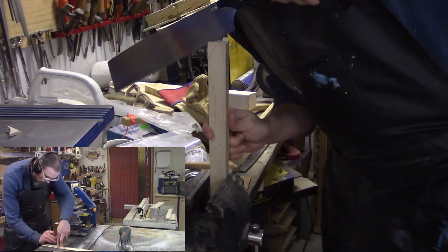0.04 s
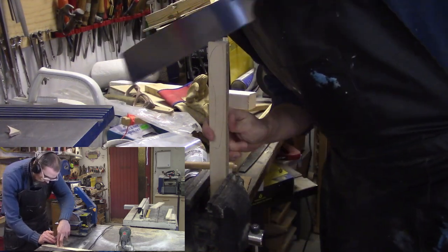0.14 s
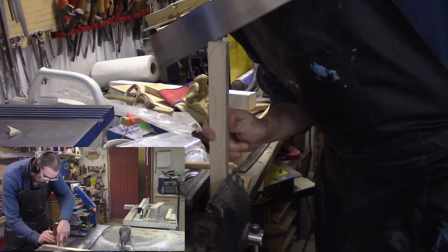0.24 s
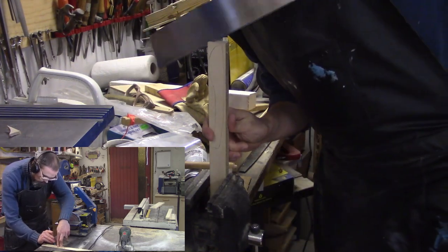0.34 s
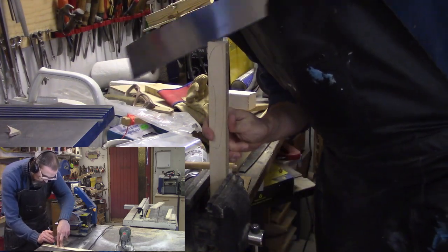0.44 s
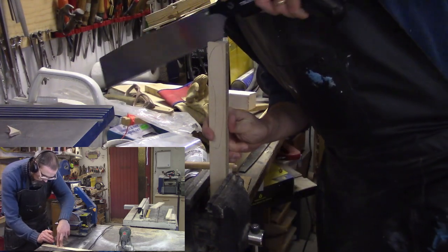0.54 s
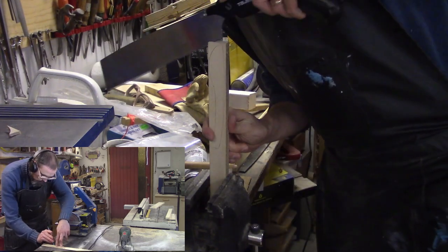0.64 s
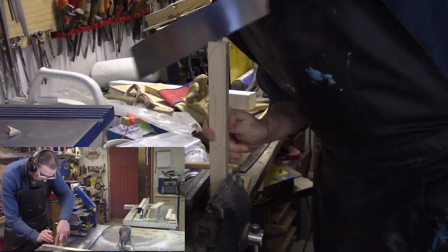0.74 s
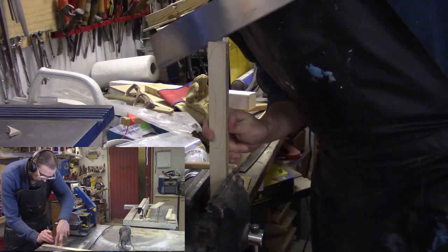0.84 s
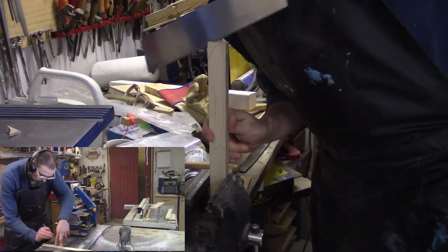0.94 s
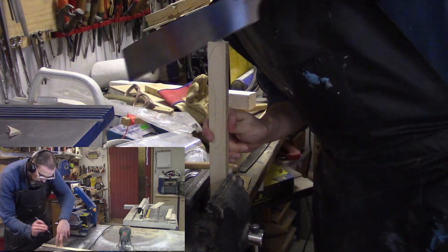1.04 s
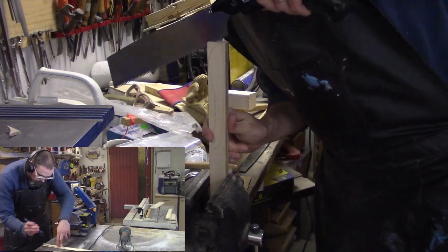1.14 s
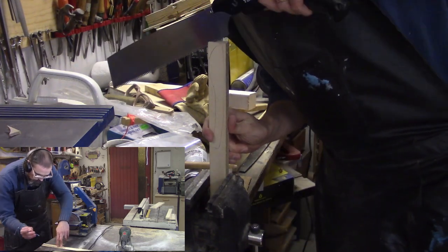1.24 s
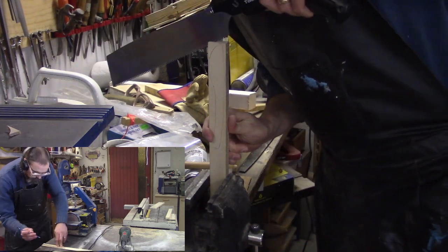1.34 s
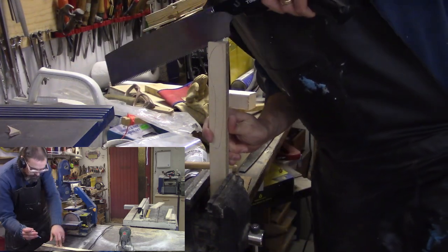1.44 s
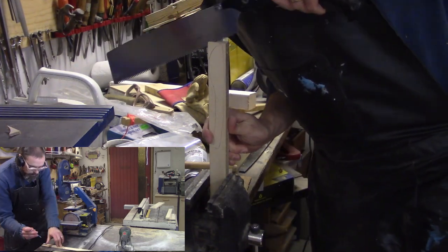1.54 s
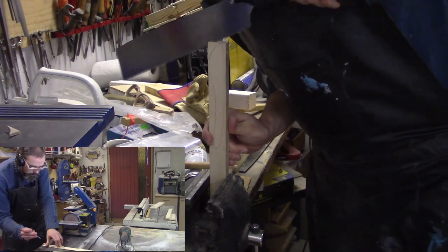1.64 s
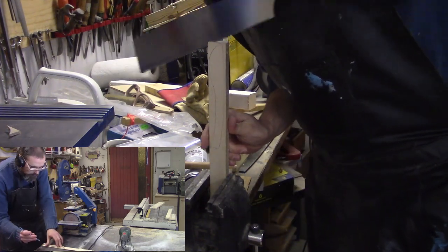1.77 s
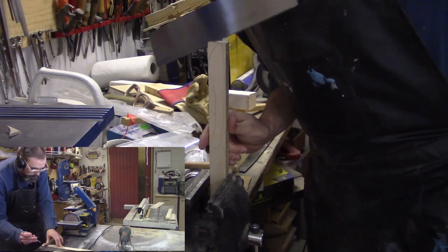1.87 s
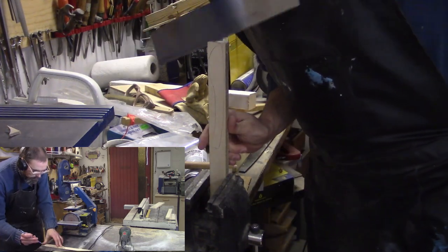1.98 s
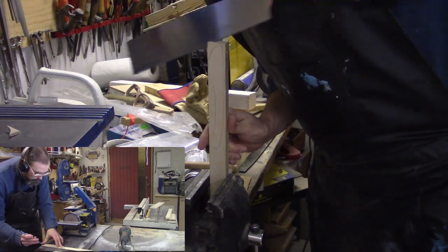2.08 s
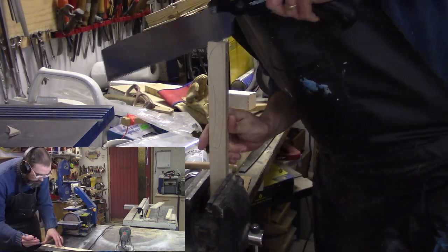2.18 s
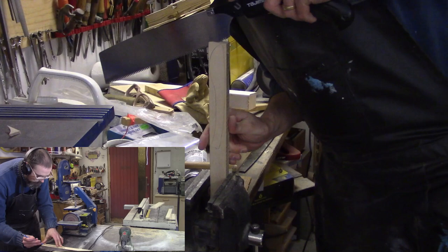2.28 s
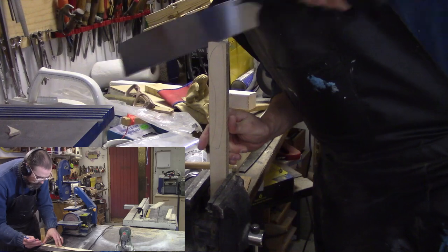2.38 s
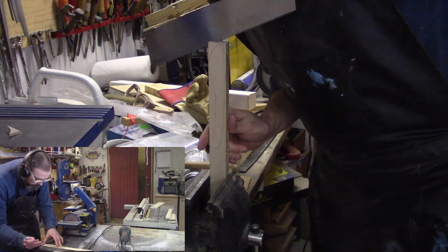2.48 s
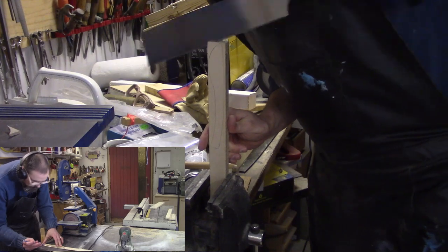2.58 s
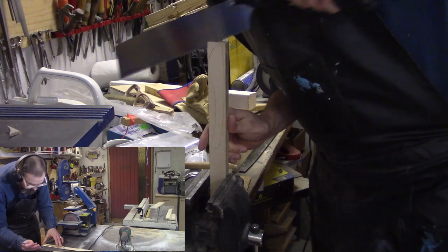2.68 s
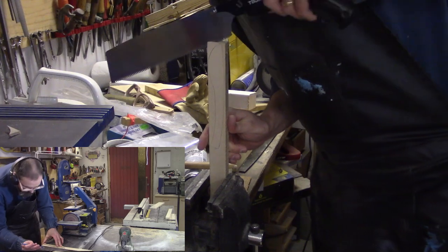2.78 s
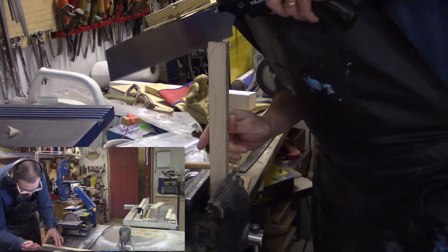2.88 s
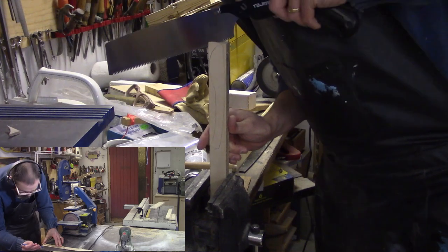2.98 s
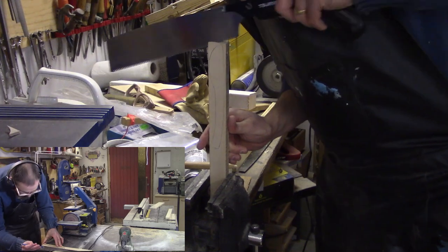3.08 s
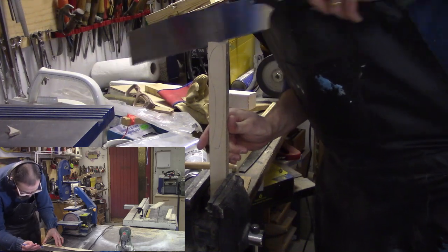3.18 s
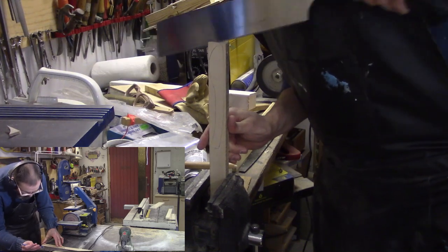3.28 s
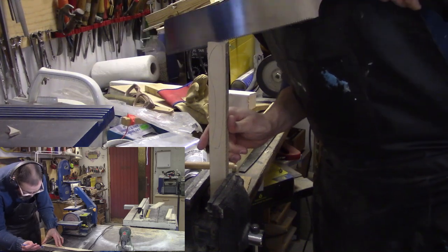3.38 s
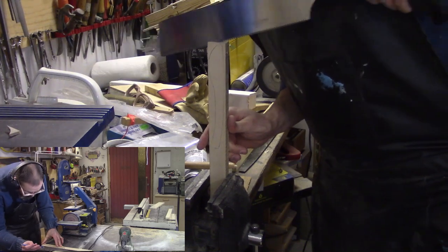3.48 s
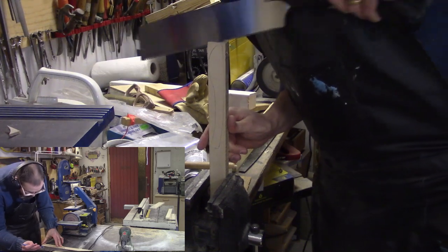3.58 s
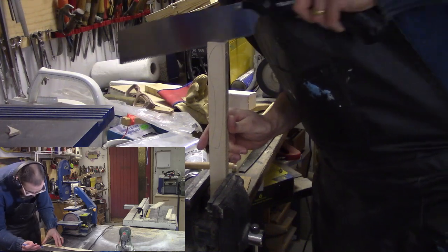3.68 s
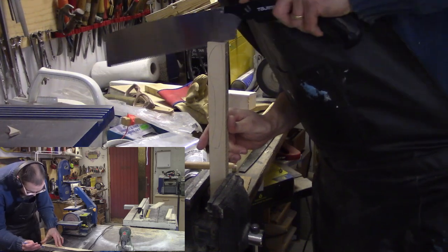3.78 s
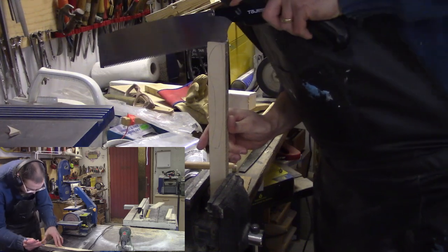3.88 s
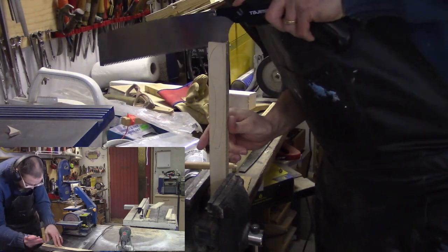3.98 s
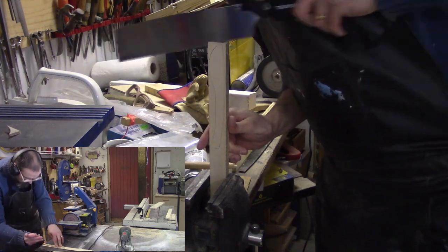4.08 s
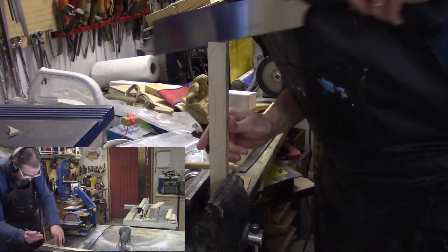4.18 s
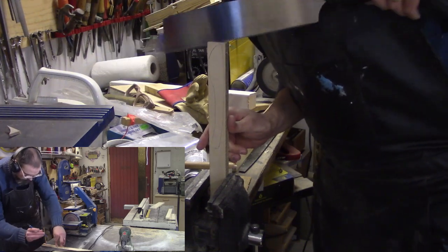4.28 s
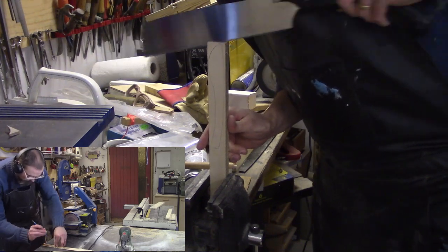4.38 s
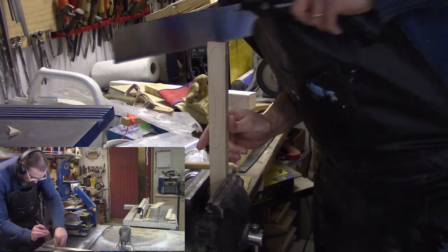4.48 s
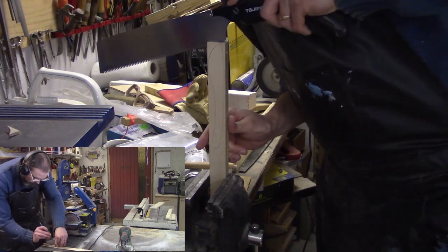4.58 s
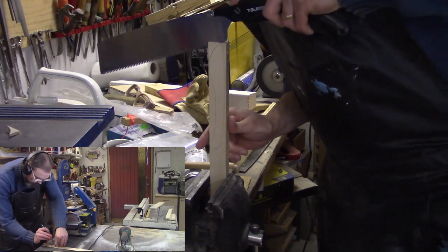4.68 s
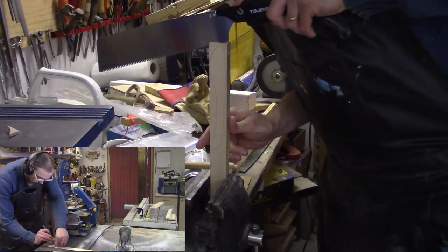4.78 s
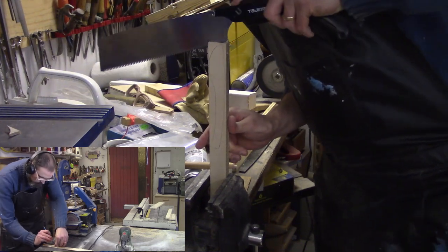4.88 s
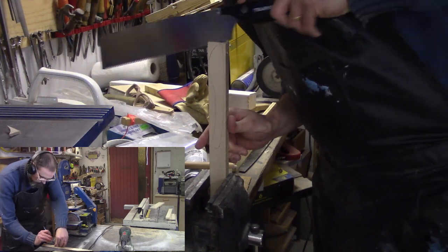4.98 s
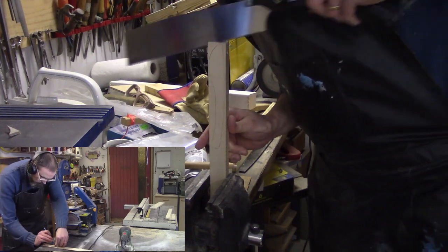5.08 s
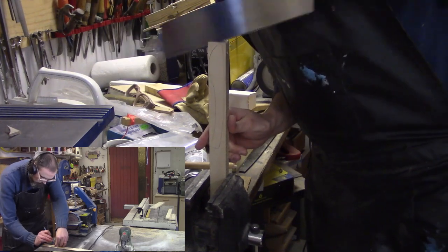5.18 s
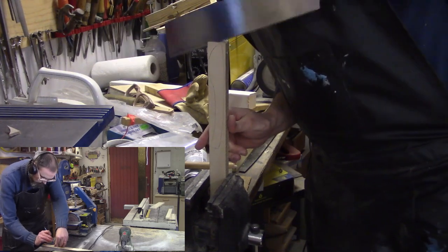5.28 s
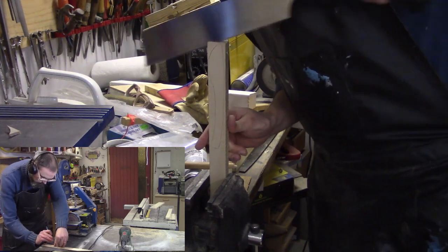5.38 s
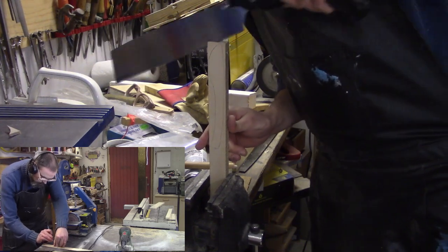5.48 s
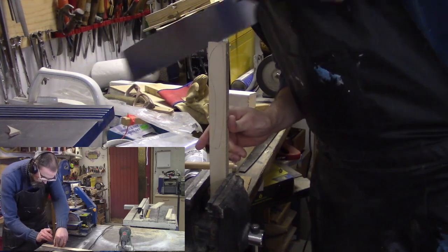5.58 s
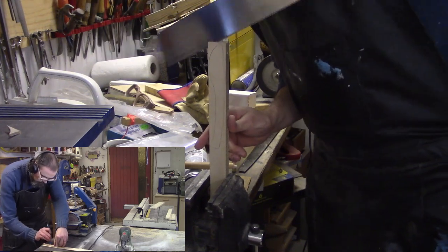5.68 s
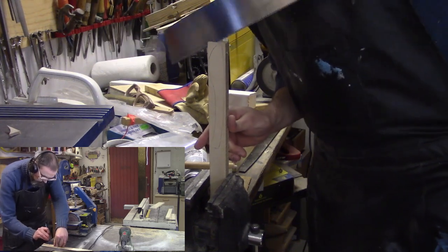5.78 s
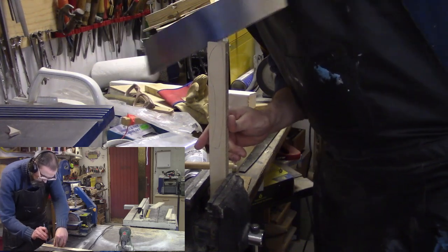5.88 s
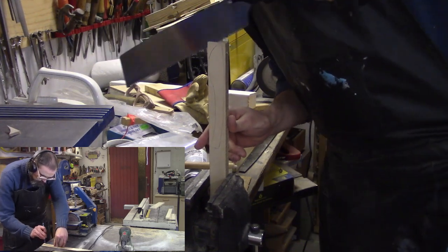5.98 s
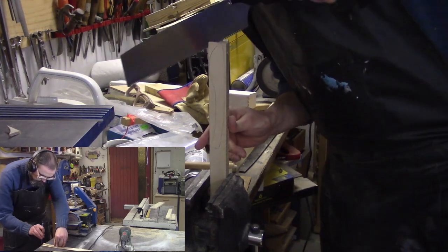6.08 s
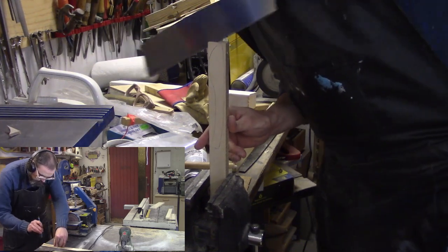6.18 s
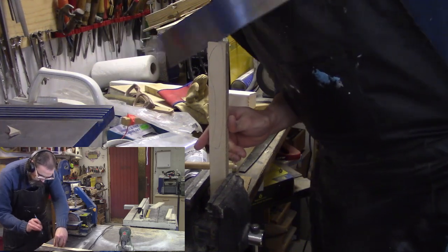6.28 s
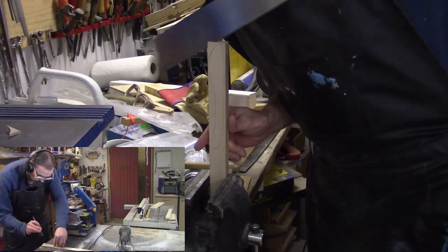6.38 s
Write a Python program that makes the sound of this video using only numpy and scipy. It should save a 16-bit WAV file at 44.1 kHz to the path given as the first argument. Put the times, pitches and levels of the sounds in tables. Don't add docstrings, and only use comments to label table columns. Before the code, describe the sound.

Close up in a quiet indoor workshop, a fine hand saw cuts a board held in a vise. Quick loud strokes come first, then a pause with faint blade ringing and a high chirp, a slow light push, and uneven groups of strokes. Each mixes a low woody stutter, tearing fibres and steely rasp. The sound is nearly central with little reverberation, ending on quiet room air.

```python
import sys
import numpy as np
from scipy import signal
from scipy.fft import rfft, irfft, next_fast_len
from scipy.io import wavfile
from scipy.ndimage import uniform_filter1d

SR = 44100
rng = np.random.default_rng(int(sys.argv[2]) if len(sys.argv) > 2 else 0)


def boost(x):
    u = np.asarray(x, float) / 20
    return 10 ** u


def store_wav(level_fs):
    pcm = np.round(np.clip(np.atleast_2d(level_fs), -1, 1) * 32767)
    wavfile.write(sys.argv[1], SR, pcm.T.astype(np.int16))


N = 283563

# (blade starts [s], full pressure [s], eases [s], board level [dB], change while held [dB])
STROKES = [(-.08, 0, 0.066, -12.5, -2), (0.148, 0.221, 0.28, -7, -1.5), (0.368, 0.488, .59, -11.5, -3),
           (0.686, 0.783, 0.9, -8.5, -21), (0.934, 1.077, 1.17, -9.5, -3), (1.492, 1.608, 1.944, -29, 5.5),
           (2.081, 2.143, 2.213, -10.5, 2.5), (2.345, 2.408, 2.52, -18.5, -10),
           (2.606, 2.707, 2.762, -12, -4.5), (3.119, 3.161, 3.355, -20.5, 2),
           (3.478, 3.646, 3.895, -11, -18), (4.037, 4.12, 4.24, -18.5, -0.5),
           (4.392, 4.462, 4.597, -10.5, -0.5), (5.04, 5.053, 5.25, -13.5, -9),
           (5.331, 5.461, 5.563, -12, 0.5), (5.582, 5.642, 5.75, -22.5, 0), (5.807, 5.979, 6.025, -11, 0),
           (6.138, 6.195, 6.333, -20.5, -8)]
SHOVES = [(1.48, 1.493, 1.5, -34, -5), (1.745, 1.874, 1.936, -21, -3), (2.029, 2.053, 2.22, -21, 6.5),
          (4.177, 4.223, 4.33, -15.5, -17), (4.337, 4.372, 4.453, -24, 9.5), (5.175, 5.227, 5.157, -7.5, 4),
          (6.398, 6.449, 7.2, -35.5, -1), (4.108, 4.145, 4.152, -11, 0.5), (5.638, 5.72, 5.706, -9, 0),
          (6.112, 6.122, 6, -41.5, -4), (6.028, 6.04, 6.06, -8.5, -3.5)]
# (vise thud [dB], tearing [dB], blade rasp [dB], hiss [dB])
BITES = [(-16.5, -12, -14.5, -18), (-22, -14, -19, -19), (-11.5, -11, -17.5, -20), (-31, -13, -18, -17),
         (-14.5, -12, -18, -23), (-10, -9.5, -13.5, -11.5), (-13.5, -11, -16.5, -19), (-6.5, -5, -7, -8.5),
         (-8, -7.5, -11.5, -14), (-9.5, -8.5, -12, -11.5), (-9.5, -11.5, -18.5, -22.5),
         (-8.5, -5.5, -8, -9), (-12.5, -9, -14.5, -18.5), (-8.5, -6, -14, -13.5),
         (-11, -13.5, -16.5, -19.5), (-16, -5.5, -8.5, -6.5), (-15, -9.5, -14.5, -18),
         (-10, -6.5, -11, -10.5), (-1, -11, -34, -16), (-31, -18, -21, -17), (-20, -19, -22.5, -22.5),
         (-22, -20, -24, -17), (-10.5, -15.5, -14, -14.5), (-18, -31, -4.5, -6.5), (2, 5, -3, -7),
         (-27, -17, -10.5, -28), (-38, -32, -17, -18), (-9, -11, -5, -1), (-15.5, -12, -20, -48)]
# (power of the rise [-], share of the change while held [-],
# release [dB/s], echo of the shop [dB], fall of the echo [dB/s])
LAYER_LAWS = [
    (1.82, 1.05, 279, -28.5, 114),
    (1.04, 0.7, 187, -43, 110),
    (1.9, 1, 241, -36, 150),
    (1.58, 0.72, 235, -29, 150),
    (1.18, 0.55, 198, -36, 150),
]
IDLE_DB = [-65, -73, -62.5, -70, -65]
LEAD_S = [0.0042, 0, 0.0073, 0.012, 0.021]
STOPS = [.074, .305, .628, .886, 1.208, 1.51, 1.968, 2.272, 2.547, 2.808, 3.398, 3.922, 4.285, 4.62, 5.28,
         5.568, 5.778, 6.048, 6.145, 6.35, 6.6]
STOP_DB_PER_S = [1, 1, 25, 98, 640]
# (time [s], level [dB], length [ms])
JOLTS = [(0.195, -2.5, 4.9), (0.518, 3, 3), (0.556, -5, 13.0), (0.761, -6.5, 9.0), (0.811, 3.5, 10),
         (1.044, 2.5, 3.4), (1.057, -4, 4.0), (1.103, -6, 3.3), (1.157, 1, 3), (1.269, -9.0, 9.0),
         (1.529, -3, 11), (1.752, -12, 6.0), (1.776, 3.5, 4.9), (1.821, -11, 4.4), (2.126, -9, 4.0),
         (2.171, -3.0, 4.7), (2.227, -2, 6.5), (2.433, -7, 4.3), (2.676, 2, 11), (2.708, -1, 3.2),
         (2.761, 5, 9.0), (2.819, 2.5, 16), (3.241, 2.5, 17), (3.295, 4.5, 9.8), (3.369, -3.5, 12),
         (3.572, -5, 5.5), (3.609, 6, 5.3), (3.725, 1, 21), (3.778, 3, 11), (4.169, -6, 10),
         (4.273, 7.5, 8.4), (4.459, 4, 4.6), (4.524, -1, 4.0), (4.615, -3, 26), (5.052, 3.0, 4.0),
         (5.075, -5, 8.5), (5.137, -6, 6.9), (5.162, 4.0, 6.3), (5.212, -5, 6.0), (5.237, 7.5, 7.1),
         (5.255, 0, 4.0), (5.38, 8, 5.2), (5.413, -9, 8.4), (5.435, 4.5, 4.4), (5.554, -6.5, 9.0),
         (5.636, 3, 7.6), (5.771, 2.5, 16), (5.912, -13, 7.5), (5.953, -3, 3.31), (5.977, 2, 5.1),
         (6.016, -10, 3.6), (6.065, -5.5, 6.0), (6.126, -7, 18.0), (6.219, -11, 5.1), (6.262, 5, 25)]
# (time [s], level [dB], length [ms])
RIPS = [(0.063, 1, 7.7), (0.185, 3, 11), (0.253, -3, 14), (0.304, -4, 8.3), (0.434, 9.5, 4.2),
        (0.787, -3.5, 13.0), (1.06, 2.5, 7.8), (1.076, -3, 4.4), (1.101, 0, 18.0), (2.037, -3, 9),
        (2.153, 3.5, 18), (2.24, 6, 12), (2.299, -5, 18.0), (2.353, -10, 18.0), (2.654, -7, 9.5),
        (2.739, -3.5, 15), (2.802, -5.5, 16), (3.165, -4, 10.8), (3.208, 1, 12), (3.25, 5.5, 23),
        (3.305, 4, 13.0), (3.357, -6, 16), (3.594, 4, 6.9), (3.626, -4, 4.6), (3.64, 0, 3.4),
        (3.661, -8, 9.4), (3.712, 2, 2.8), (4.108, -3.5, 16.05), (4.444, -5, 23), (4.505, 4, 3.6),
        (4.548, 5, 4.4), (4.574, -3, 6.0), (5.055, -1, 4.0), (5.085, 2.5, 4.0), (5.139, -4.0, 17),
        (5.226, -3.5, 12), (5.41, -5, 18), (5.449, 8, 6.0), (5.482, -4.5, 3.6), (5.513, 7, 18),
        (5.618, -3, 36), (5.907, -10.5, 11.5), (5.972, 3, 7.2), (6.055, -1.5, 11), (6.101, -5, 7.01),
        (6.19, -6.5, 17)]
# (frequency [Hz], width [Hz], level [dB])
BOARD = [(286.5, 6.3, -13), (320, 26, -2), (385, 26, 0), (427.2, 15, -4.5), (439.6, 4.3, -19)]
# (from [s], to [s], from [Hz], to [Hz], level against the rumble [dB])
LOCKS = [(0, 0.05, 316, 320, 5), (0.182, 0.243, 401, 394, -0.5), (0.197, 0.324, 337.7, 323.6, 10.5),
         (0.425, 0.5, 386, 385, 0.5), (0.735, 0.849, 372, 391, 13), (1.051, 1.223, 332.2, 342, 1),
         (1.844, 1.927, 432, 454, 14.5), (1.817, 1.948, 348, 397.5, 6), (2.11, 2.19, 385, 378, 7.5),
         (2.172, 2.29, 317.3, 312.4, 9), (2.201, 2.365, 256.2, 287.4, 8), (2.655, 2.778, 372.5, 320, 5),
         (3.215, 3.371, 315.7, 340, -0.5), (3.581, 3.724, 320, 320, 4.5), (4.107, 4.161, 385, 403, 5),
         (4.182, 4.316, 340, 295, 18), (4.351, 4.428, 285, 265.4, 10), (4.43, 4.505, 394.5, 385, 6.5),
         (4.485, 4.63, 284.6, 272, 5.5), (5.207, 5.26, 308, 296, 16.5), (5.424, 5.455, 374, 390, 6),
         (5.439, 5.595, 329, 300, 1), (5.669, 5.778, 397.5, 349.5, 15.5), (5.918, 6.005, 371, 354.4, 3.5),
         (0.399, 0.484, 277, 275, 2), (0.501, 0.544, 320, 376, 10), (3.612, 3.717, 392.6, 387, -2),
         (3.659, 3.736, 253, 244, 0.5), (3.787, 3.89, 301, 296, 3), (5.679, 5.787, 790, 778, -4.5),
         (5.69, 5.79, 1290, 1280, -12), (5.65, 5.793, 1956, 1966, -10), (5.74, 5.79, 2320, 2270, -9),
         (5.437, 5.468, 4270, 4280, -11), (.268, 0.292, 4390, 4280, -10.5), (4.5, 4.558, 1246, 1220, -26),
         (4.555, 4.589, 993, 987, -1.5)]
# (from [s], to [s], from [Hz], level [dB])
HUMS = [(.193, 0.243, 688, -2), (.243, 0.344, 790, -5.5), (.472, 0.678, 236.7, -2.5),
        (1.0, 1.26, 151.3, -9.5), (1.1, 1.252, 239, -1.5), (1.5, 1.993, 152, -9), (2.034, 2.106, 254, 8),
        (2.68, 2.756, 244, -2), (3.5, 3.804, 147, -14), (4.44, 4.624, 146.2, -6), (5.361, 5.4, 248, 0),
        (5.85, 5.912, 238, 7.5), (5.934, 6.05, 119.3, -11), (6.008, 6.124, 336, 7)]
# (from [s], to [s], frequency [Hz], level
# against the rumble [dB])
SINGS = [(2.175, 2.26, 2600, -21), (2.13, 2.19, 3400, -24), (2.74, 2.785, 3095, -15),
         (2.9, 2.74, 5750, -10), (2.72, 2.745, 5150, -20), (3.58, 3.7, 3095, -22),
         (3.58, 3.64, 4280, -21.5), (.567, 0.584, 5750, -13), (.01, .07, 5300, -20),
         (3.19, 3.24, 1000, -4.5), (1.77, 1.84, 1030, -11), (1.87, 1.99, 720, -10), (1.6, 1.74, 455, -1.5),
         (.488, .505, 1300, -4), (5.45, 5.47, 3400, -16)]
# (frequency [Hz], width [Hz], level [dB])
THUD = [(127.7, 22, -6.5), (145.6, 36, -1.5), (193, 24, -4), (241, 30, 5.5)]
# (frequency [Hz], level [dB per Hz])
TEAR = [(280, -25.5), (480, -4), (747, -2.5), (829, -17.5), (982, -3.5), (1130, -9), (1250, -8.5),
        (2800, -22.5), (3640, -24.5), (6160, -120)]
# (frequency [Hz], width [Hz], level [dB])
GRAIN = [(523, 430, -10), (655, 19, -6), (790, 53, -17), (978, 77, -4.5), (1236, 27, -2), (1570, 32, -19),
         (2000, 77, -11)]
# (frequency [Hz], level [dB per Hz])
RASP = [(1060, -26), (1800, 0.5), (3010, -2), (3800, -7), (4380, -3), (6130, -10.5), (6940, -5.5),
        (8670, -11), (10000, -8.5), (15000, -18)]
# (frequency [Hz], width [Hz], level [dB])
BLADE = [(2327, 70, 5.5), (2760, 35, 2), (3057, 66, 9), (3530, 55, 1.5), (4240, 78, 2.5), (4560, 44, 0.5),
         (4940, 17, 2.5), (5720, 30, 2), (5920, 36, 3.5), (6650, 35, 2.5), (7050, 330, 1), (7420, 37, -3),
         (8140, 160, -7), (9690, 150, 3), (11500, 22, -14), (12450, 110, -14)]
# (time [s], peak level [dB], length [ms])
SNAGS = [(0.019, -1.5, 4.5), (0.168, -21, 14), (0.274, -14, 8.6), (0.427, -20, 3.9), (0.537, -10, 9.2),
         (1.069, -5.5, 30), (1.1294, -5, 5.1), (1.537, -28, 5.8), (2.072, -19, 11), (2.134, -2.5, 16),
         (2.1794, -24, 3.5), (2.395, -13, 8.3), (2.713, 5.5, 8.6), (3.1158, -20.5, 10), (3.582, -29, 9.1),
         (5.012, -41, 18), (4.0558, -21, 5.4), (4.118, -23, 6.1), (4.5075, -7, 39), (4.567, -4, 7.51),
         (5.077, -8, 8.8), (5.3777, -24, 8.8), (5.4418, -10, 10), (5.4616, -2.5, 9.8), (5.5064, 4.5, 6.6),
         (5.931, -15, 6.3), (6.022, -8, 12.4), (6.159, -15, 5.2)]
# (time [s], peak level [dB])
TICKS = [(0.409, -12), (0.471, -10), (0.728, -11), (1.006, -15), (1.554, -37), (2.07, -12), (2.367, -16),
         (2.648, -22), (3.196, -22), (3.583, -5.5), (3.636, -12), (3.69, -13), (4.118, -15), (4.478, -14),
         (5.168, -12), (5.377, -20), (5.929, -18), (5.975, -9), (6.229, -18)]
# (time [s], frequency [Hz], level [dB], decay by 60 dB [s])
RINGS = [(0.321, 1900, -47, 0.68), (.32, 2700, -57, .6), (0.635, 2500, -47, 0.5), (1.21, 2680, -49.5, 1.9),
         (.055, 10700, -49, 0.23), (3.93, 2700, -59, .8), (1.219, 291, -35, 0.56), (1.24, 5600, -67, 2.4),
         (2.24, 8560, -52, 0.96), (2.29, 1790, -46.5, 0.65), (2.28, 2690, -57, .8), (2.55, 2700, -55, 0.4),
         (2.802, 294, -26, 0.42), (2.81, 5250, -55, .4), (2.83, 8540, -69, 1.2), (3.401, 2750, -56, 0.87),
         (3.92, 8500, -72, 0.82), (4.281, 2700, -45, 0.5), (4.63, 8450, -56.5, 0.88),
         (4.67, 2700, -51, 0.69), (4.68, 2730, -52, .6), (4.66, 441, -44, 0.56), (4.66, 765, -49, 0.41),
         (5.78, 2840, -47, .5), (4.2, 258, -27, 0.28), (4.66, 288.3, -34, 0.5), (4.72, 1790, -60.5, 2.6),
         (4.6, 2840, -46, 0.63), (5.25, 2680, -45, 0.76)]
# (time [s], length [s], from [Hz], to [Hz], level [dB])
SQUEAKS = [
    (1.24, 0.19, 10700, 11000, -65),
    (1.22, .2, 13300, 13100, -72),
    (1.28, .13, 12200, 11700, -70),
    (2.822, 0.07, 13700, 10600, -63),
    (2.85, .04, 13200, 12000, -69),
    (4.29, 0.066, 13700, 13200, -60),
    (5.767, 0.079, 12750, 11250, -52),
    (5.799, .06, 13800, 13100, -66),
]
# (frequency [Hz], level [dB per Hz])
SHOP = [(15, -59), (25, -11), (139, -13), (257, -12), (293, -1.5), (588, -19.5), (1760, -10.5),
        (1910, -14.5), (5570, -25.5), (12100, -33), (13000, -50), (15000, -75)]
# (frequency [Hz], side minus mid [dB])
WIDTH = [(30, -9), (60, -17), (150, -43), (370, -35.5), (690, -26), (1270, -27), (2340, -21), (4300, -16.5),
         (7920, -17.5), (12000, -17.5), (15000, -13)]
# (frequency [Hz], side minus mid [dB])
SHOP_WIDTH = [(30, -8), (200, -5), (300, -14), (700, 0), (1500, -14), (6000, -10), (15000, -18)]

HUM_SAG = 0.053
SOFT_HZ = 925
HISS_HZ = 6420
JOLT_SHARE, RIP_SHARE = 0.33, 0.33
TICK_RISE_S, TICK_FALL_S = 0.0014, 0.0049
ARCH_HZ_PER_S2 = 17000
SHOP_DB = -54.5
THROB_HZ = 46.875


def unit(x):
    return x / np.sqrt(np.mean(x ** 2))


def colour(x, shape):
    hz, db = np.transpose(shape)
    size = next_fast_len(N)
    grid = np.log(np.arange(size // 2 + 1) * SR / size + 1)
    return irfft(rfft(x, size) * boost(np.interp(grid, np.log(hz), db)), size)[..., :N]


def walk(rate):
    hold = int(SR / rate)
    steps = np.repeat(rng.standard_normal(N // 20), hold)[:N]
    return uniform_filter1d(steps, hold // 2 + 1)


def even(x, span_s):
    return x / np.sqrt(uniform_filter1d(x ** 2, int(span_s * SR)) + 1e-9)


def modes(x, table, patchy_db):
    out = np.zeros(N)
    for hz, width, db in table:
        drive = x * boost(db + patchy_db * np.tanh(walk(16)))
        out += signal.lfilter(*signal.iirpeak(hz, hz / width, SR), drive)
    return out


def grit(rate, spread_db):
    snaps = (rng.random(N) < rate / SR) * rng.standard_normal(N)
    hardness = np.minimum(rng.exponential(1, N), 3.5)
    return unit(snaps * boost(spread_db * hardness))


def chatter(t):
    soft = signal.butter(3, SOFT_HZ, fs=SR, output="sos")
    out = unit(signal.sosfilt(soft, modes(grit(1500, 1.38), BOARD, patchy_db=5.5)))
    waver = 1 + 0.016 * walk(80)
    swell = boost(2.4 * walk(60))
    hums = [(s0, s1, hz, hz * (1 - HUM_SAG), db) for s0, s1, hz, db in HUMS]
    sings = [(s0, s1, hz, hz, db) for s0, s1, hz, db in SINGS]
    for s0, s1, hz0, hz1, db in LOCKS + hums + sings:
        on = slice(int(s0 * SR), int(s1 * SR))
        u = (t[on] - s0) / (s1 - s0)
        phase = 2 * np.pi * np.cumsum((hz0 + (hz1 - hz0) * u) * waver[on]) / SR
        grip = np.tanh(6 * np.sin(np.pi * u) ** 2)
        out[on] += boost(db - 1.5) * grip * swell[on] * np.sin(phase)
    return even(out, 0.0326)


def vise_thud():
    band = signal.butter(3, [90, SOFT_HZ], "band", fs=SR, output="sos")
    return even(signal.sosfilt(band, modes(grit(900, 0.93), THUD, patchy_db=1.5)), 0.136)


def sheet(x, t60):
    size = next_fast_len(N + SR // 4)
    lag = np.arange(int(t60 * SR)) / SR
    tails = rfft(rng.standard_normal((4, len(lag))) * boost(-60 * lag / t60), size)
    tails /= np.sqrt(np.mean(np.abs(tails) ** 2, axis=0))
    turns = np.array([x * walk(12) for _ in tails])
    return unit(irfft(np.sum(rfft(turns, size) * tails, axis=0), size)[:N])


def mottle(x, depth_db, wide_hz, long_s):
    spec = signal.stft(x, nperseg=512)[2]
    tall = int(wide_hz * 512 / SR) + 1
    wide = int(long_s * SR / 256) + 1
    field = uniform_filter1d(rng.standard_normal(spec.shape), tall, axis=0)
    field = uniform_filter1d(field, wide, axis=1)
    patchy = spec * boost(depth_db * field / field.std())
    return unit(signal.istft(patchy, nperseg=512)[1][:N])


def rasp(board, table, shape, modes_db, sheet_db, gate, flicker_db):
    push = (grit(6000, 2.7) + 1.53 * rng.standard_normal(N)) * (1 + gate * board)
    broad = unit(colour(push, shape))
    plate = boost(sheet_db) * sheet(broad, t60=.09)
    resonant = boost(modes_db) * unit(modes(push, table, patchy_db=3.5))
    sound = even(broad + plate + resonant, 0.047)
    return mottle(sound, depth_db=1.14, wide_hz=450, long_s=.022) * boost(flicker_db * walk(45))


def fibres_and_blade(board):
    tear = rasp(board, GRAIN, TEAR, modes_db=-7.5, sheet_db=1.4, gate=0.25, flicker_db=0.13)
    steel = rasp(board, BLADE, RASP, modes_db=-6.5, sheet_db=-0.16, gate=0.11, flicker_db=0.71)
    hiss = colour(steel, [(HISS_HZ / 1.15, -60), (HISS_HZ, -6), (HISS_HZ * 1.15, 0)])
    steel = steel - hiss
    hiss = hiss * boost(0.54 * walk(40))
    teeth = unit(boost(2.2 * np.tanh(walk(700) * 2)))
    return tear * teeth, steel * teeth, hiss * teeth


def pressure(t):
    power = boost(2 * np.array(IDLE_DB))[:, None] + 0 * t
    for (start, full, ease, db, held_db), bite in zip(STROKES + SHOVES, BITES):
        on = slice(max(int(start * SR), 0), int((ease + .5) * SR))
        rise = np.clip((t[on] - start) / (full - start), 0, 1)
        held = held_db * np.clip((t[on] - full) / (ease - full), 0, 1)
        stop = min(s for s in STOPS if s > full)
        still = np.clip(t[on] - stop, 0, 9)
        for k, (curve, share, release, echo_db, fall) in enumerate(LAYER_LAWS):
            late = np.clip(t[on] - ease + LEAD_S[k], 0, 9)
            gain = boost(db + (0, *bite)[k] + share * held) * rise ** curve
            direct = boost(-release * late - STOP_DB_PER_S[k] * still)
            echo = boost(echo_db - fall * late)
            power[k, on] += (gain * (direct + echo)) ** 2
    return np.sqrt(power)


def bumps(t, table):
    return sum(db * np.exp(-.5 * ((t - s) * 1000 / ms) ** 2) for s, db, ms in table)


def cutting_force(t):
    jolt, rip = bumps(t, JOLTS), bumps(t, RIPS)
    swing = [jolt, JOLT_SHARE * jolt, rip, RIP_SHARE * rip, RIP_SHARE * rip / 2]
    return pressure(t) * boost(np.array(swing))


def snags(t):
    out = np.zeros(N)
    for s, db, ms in SNAGS:
        on = slice(int(s * SR), int(s * SR) + SR // 8)
        age = t[on] - s
        out[on] += boost(db + 4) * np.exp(-age * 1000 / ms) * np.clip(age / 0.0066, 0, 1)
    return out


def ticks(t):
    out = np.zeros(N)
    for s, db in TICKS:
        age = np.clip(t - s, 0, 1)
        out += boost(db - 15.5) * np.clip(age / TICK_RISE_S, 0, 1) * np.exp(-age / TICK_FALL_S)
    return out


def rings(t):
    out = np.zeros(N)
    for s, hz, db, t60 in RINGS:
        on = slice(int(s * SR), int((s + .4) * SR))
        age = t[on] - s
        fade = np.clip(age / 0.013, 0, 1) * boost(-60 * age / t60)
        fade = fade * np.clip((.33 - age) / 0.081, 0, 1)
        beating = boost(db + 2.5 * np.tanh(walk(40)[on]))
        out[on] += beating * fade * np.sin(2 * np.pi * hz * age)
    return out


def squeaks(t):
    out = np.zeros(N)
    for s, length, hz0, hz1, db in SQUEAKS:
        u = np.clip((t - s) / length, 0, 1)
        arch = ARCH_HZ_PER_S2 * length ** 2 * np.sin(np.pi * u)
        hz = hz0 + (hz1 - hz0) * u + arch + 110 * walk(600)
        out += boost(db + 4.3 * walk(50)) * np.sin(np.pi * u) * np.sin(2 * np.pi * np.cumsum(hz) / SR)
    return out


def reflections(mid):
    lag = np.arange(int(.04 * SR))
    scatter = rfft(rng.standard_normal(len(lag)) * np.exp(-lag / (0.0026 * SR)))
    flat = irfft(scatter / np.abs(scatter))
    return colour(signal.fftconvolve(mid, flat)[:N], WIDTH)


def workshop():
    mid = boost(SHOP_DB) * unit(colour(rng.standard_normal(N), SHOP)) * boost(0.4 * walk(12))
    air = unit(colour(rng.standard_normal(N), SHOP))
    return mid, boost(SHOP_DB) * colour(air, SHOP_WIDTH)


def scene():
    t = np.arange(N) / SR
    board = chatter(t)
    thud = vise_thud()
    tear, steel, hiss = fibres_and_blade(board)
    saw = np.sum(cutting_force(t) * [board, thud, tear, steel, hiss], axis=0)
    saw = signal.sosfilt(signal.butter(3, 70, "high", fs=SR, output="sos"), saw)
    snagged = snags(t) * (boost(-18) * steel + boost(-18) * hiss + boost(-25.5) * tear)
    ticked = ticks(t) * (boost(4) * board + tear + boost(-9.5) * steel)
    shop_mid, shop_side = workshop()
    mid = saw + snagged + ticked + rings(t) + squeaks(t) + shop_mid
    side = reflections(mid) + shop_side
    return np.array([mid + side + .006 * mid, mid - side])


def roll_off(x):
    return signal.sosfilt(signal.butter(12, 15190, fs=SR, output="sos"), x)


def record(dry):
    treble = signal.sosfilt(signal.butter(2, 1500, "high", fs=SR, output="sos"), dry)
    throb = 0.1 * np.sin(2 * np.pi * THROB_HZ * np.arange(N) / SR + 1.0)
    rounded = 1.01 * np.tanh((dry + throb * treble) / .96)
    mix = signal.sosfilt(signal.ellip(12, .2, 80, 14900, fs=SR, output="sos"), rounded)
    return roll_off(mix)


dry = scene()
out = record(dry)
store_wav(out)
```